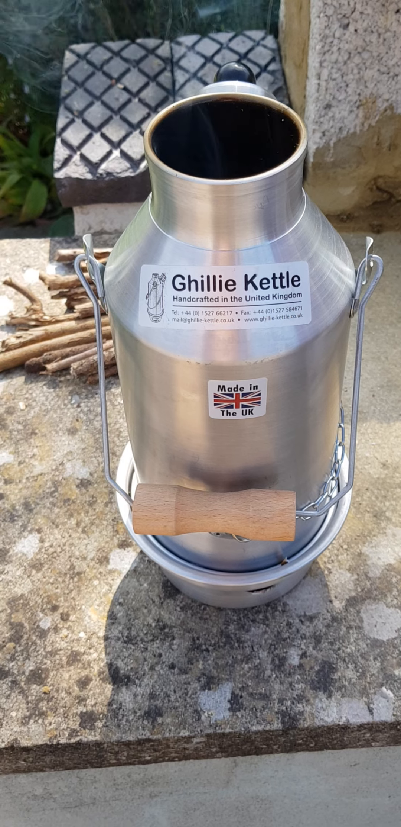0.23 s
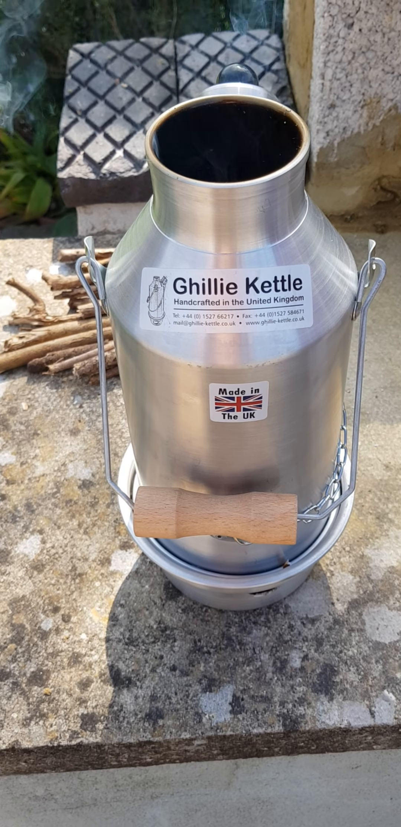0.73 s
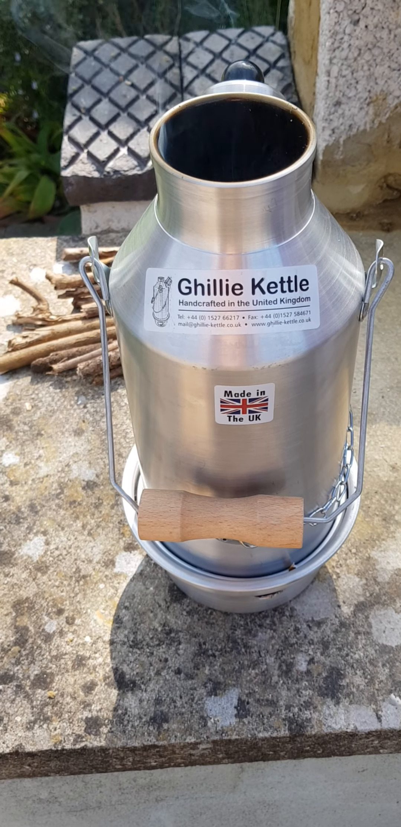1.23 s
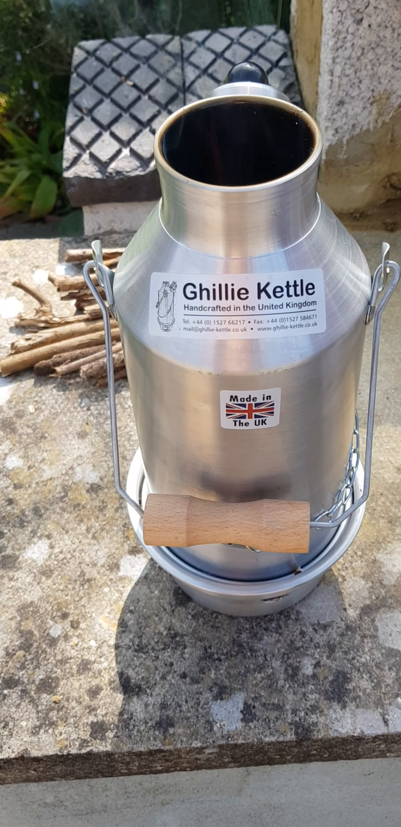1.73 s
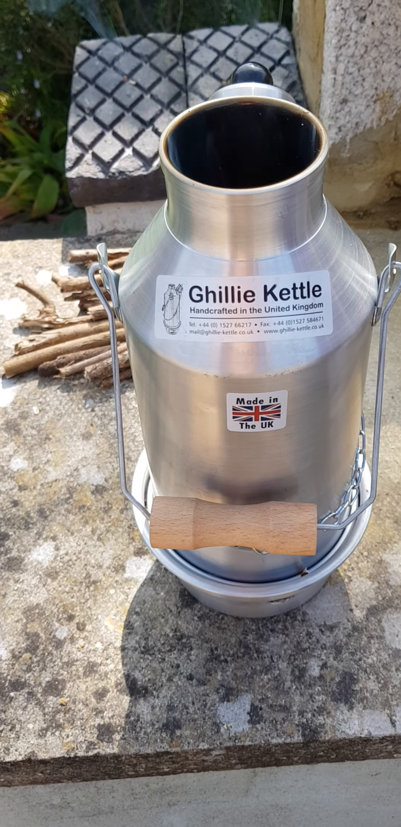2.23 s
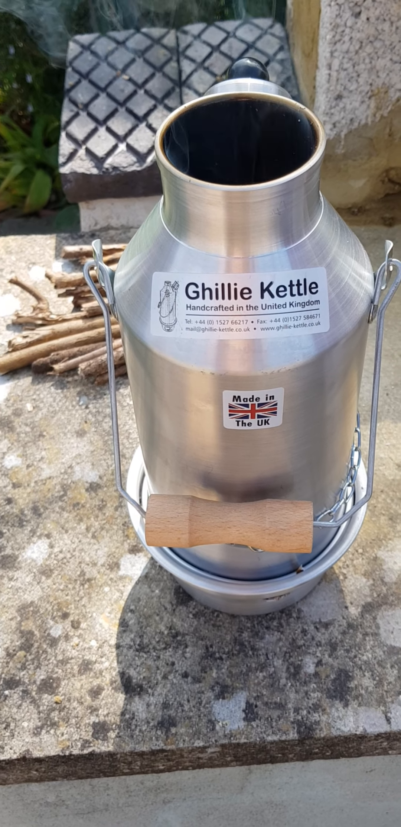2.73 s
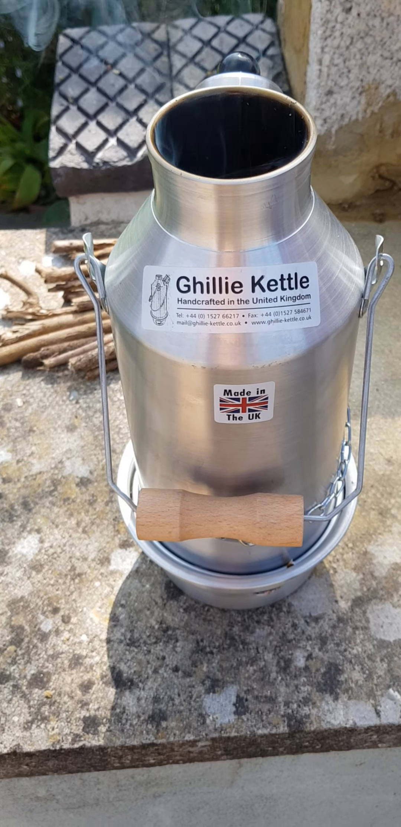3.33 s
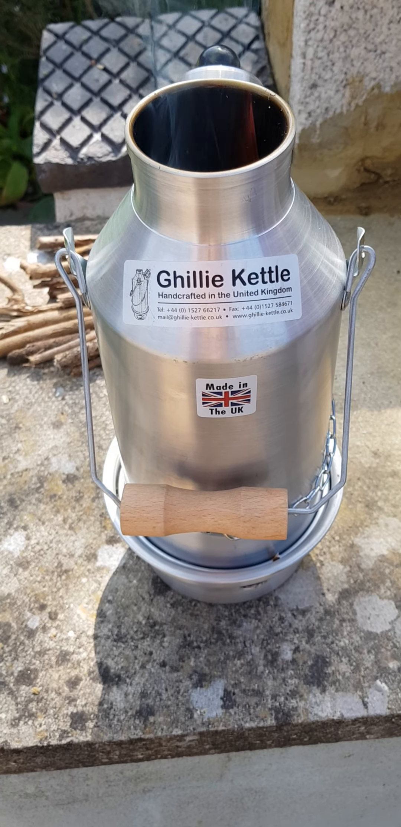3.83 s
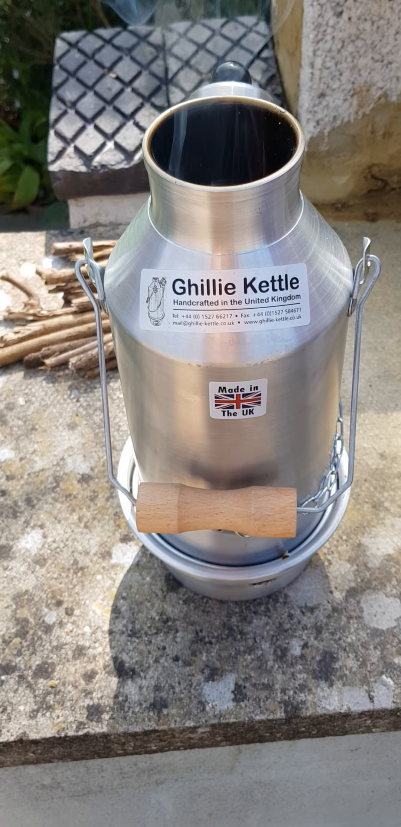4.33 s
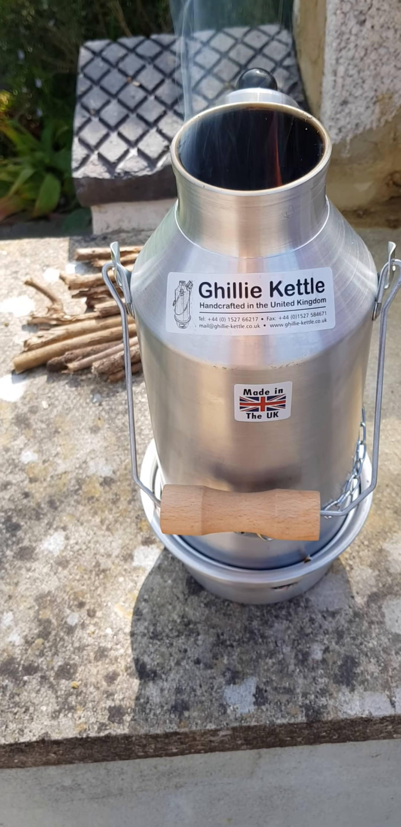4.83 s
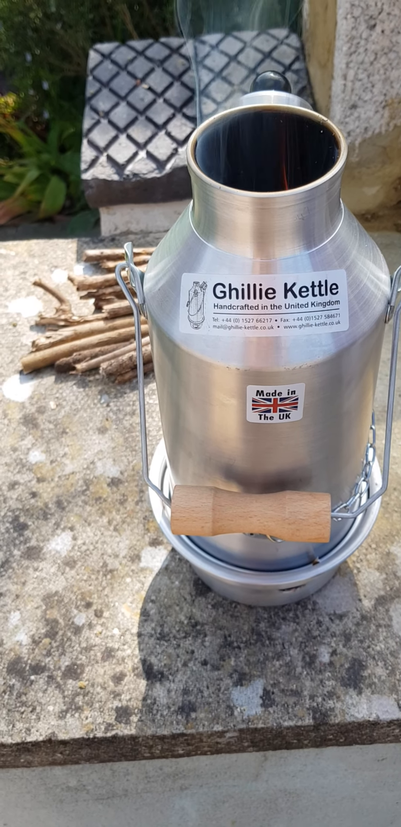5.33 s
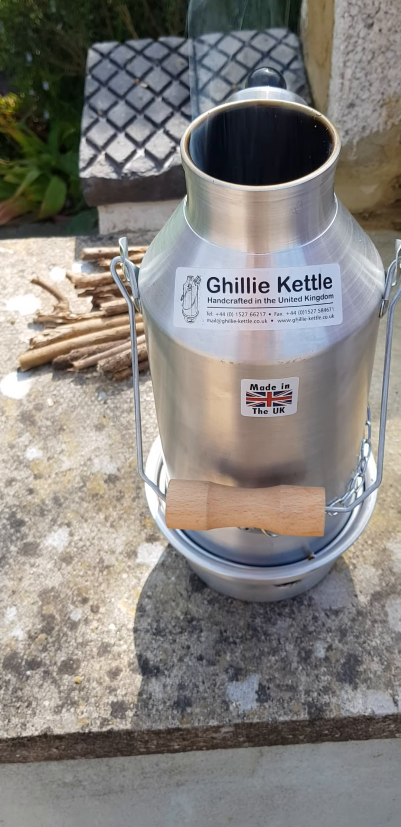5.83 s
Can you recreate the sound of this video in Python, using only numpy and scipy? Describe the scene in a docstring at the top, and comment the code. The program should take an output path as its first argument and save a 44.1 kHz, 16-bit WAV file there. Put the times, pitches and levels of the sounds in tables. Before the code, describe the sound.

Close above a metal chimney kettle outdoors, a twig fire flutters with low, hollow puffs in the flue while fine sizzle and scattered dry cracks continue throughout. Lumpy breeze rumbles on the hand-held stereo microphone, mostly early. Near the middle the puffs grow stronger, then a loud snap rings the metal wall briefly, together with a thud and scrape. Soft finger rubbing and small bumps follow.

```python
"""A twig fire burns inside a metal chimney kettle outdoors, heard from just above it.
Flame puffs strike resonant air modes of the flue; the twigs sizzle in filtered noise and crack in clicks.
Snaps also ring modes of the kettle wall; the warming metal gives a few short pips, nearly pure tones.
A waning breeze rumbles at two microphone ports; fingers rub, scuff and knock the hand-held casing."""
import sys
import numpy as np
from scipy import signal
from scipy.fft import rfft, irfft
from scipy.io import wavfile
from scipy.ndimage import uniform_filter1d

SR = 44100
rng = np.random.default_rng(int(sys.argv[2]) if len(sys.argv) > 2 else 0)


def generate_wav(sig):
    """Save sig (samples, or channels by samples) to the path in sys.argv[1] as 16-bit PCM at SR."""
    pcm = np.round(np.clip(np.atleast_2d(sig).T, -1, 1) * 32767).astype(np.int16)
    wavfile.write(sys.argv[1], SR, pcm)


N = 268304
TIME = np.arange(N) / SR
PORT_LAG_S = .00031  # extra travel from kettle to right port


def flame(flutter_db=-1.0, puff_db=1.5, left_db=-1.03, right_db=2.5, soft_hz=900,
          lead_s=0.0015, puff_ring=1.16, puff_tilt=0.28):
    """Gas puffs ring the air column of the flue; large ones ring longer and favour its upper modes."""
    # large puffs: t/s, level/dB
    puff_rows = [(0.042, -38), (0.265, -40), (0.645, -41.5), (0.7, -42.5), (0.813, -38.5), (0.918, -41),
                 (1.151, -38), (1.259, -37.5), (1.323, -38.5), (1.412, -38.5), (1.55, -38), (1.618, -37.5),
                 (1.81, -39), (2.121, -43.5), (2.975, -36.5), (3.09, -37.5), (3.313, -35), (3.367, -39.5),
                 (3.578, -40), (3.67, -32.5), (3.751, -35.5), (3.804, -41), (3.935, -41.5), (4.047, -40),
                 (4.423, -37), (4.652, -42.5), (4.748, -37), (4.85, -40), (5.259, -41.5), (5.311, -35.5),
                 (5.546, -40.5), (5.777, -42.5), (6.047, -38.5)]
    # air modes of the flue: f/Hz, level/dB, t60/s for small puffs, lag at the right port/ms
    flue_modes = [(86.3, -11, 0.056, 0.5), (172, -7, 0.022, 0.13), (236.6, -7, 0.019, 0.29),
                  (448.2, -3.5, 0.019, 0.29), (641, -21.5, 0.022, 0.0037)]
    # flame strength beneath the flare-ups, sinking and recovering: t/s, level/dB
    flame_bed = [(0, -51.5), (1.0, -48), (1.9, -50.5), (2.4, -52), (4.7, -51.5), (5.15, -54.5),
                 (5.7, -53.5), (6.08, -48)]
    # brief flare-ups: crest t/s, level/dB
    flare_rows = [(0.27, -45.5), (0.429, -41.5), (0.49, -48.5), (2.57, -46), (2.8, -49), (3.39, -44),
                  (3.69, -44.5), (3.841, -43.5), (4.76, -50.5), (5.31, -45), (5.55, -51.5), (5.87, -59)]
    rise_s, fall_s = 0.023, 0.039

    flares = (from_db(db) * swell(crest_s, rise_s, fall_s) for crest_s, db in flare_rows)
    strength = together(gains(flame_bed)[0], flares)
    small = grains(per_s=400, spread_db=2.0) * strength

    puff_s, level_db = np.transpose(puff_rows)
    main_hz = max(flue_modes, key=lambda mode: mode[1])[0]
    flutter, puffs = np.zeros((2, N)), np.zeros((2, N))
    for hz, mode_db, t60_s, lag_ms in flue_modes:
        lag_s = lag_ms / 1000
        # each puff strikes each mode with its own strength and sign
        uneven_small = small * (1 + 0.42 * rng.standard_normal(N))
        flutter_tone = from_db(mode_db) * air_mode(uneven_small, hz, t60_s)
        flutter += [flutter_tone, delayed(flutter_tone, lag_s)]

        signs = rng.choice([-1, 1], len(puff_s))
        sizes = from_db(level_db + rng.normal(0, 1.0, len(puff_s))) * signs
        large = clicks(puff_s - lead_s, sizes * (hz / main_hz) ** puff_tilt)
        puff_tone = from_db(mode_db) * air_mode(large, hz, t60_s * puff_ring)
        puffs += [puff_tone, delayed(puff_tone, lag_s)]

    flutter = rms_one(flutter) * np.sqrt(np.mean(strength ** 2))
    mix = from_db(flutter_db) * flutter + from_db(puff_db) * puffs
    return cut(mix, soft_hz, "low") * from_db([[left_db], [right_db]])


def sizzle(crackle_db=4.0, hiss_db=1.0, low_hz=700, tick_top_hz=9000, swell_hz=220):
    """Sap bursts from twigs in clumps of tiny spits over a hiss; chimney and door each let out their own."""
    # colour: f/Hz, left level/dB, right level/dB
    colour = [(895, -9, -5.5), (1275, -13.5, -13.5), (1902, -12, 0), (2276, -13, -12), (2613, -15, 3.5),
              (3245, -20.6, -5), (3930, -15, 3.5), (4500, -18, -1), (5720, -11.5, 0), (7200, -16.5, -16),
              (8380, -13, -22), (10350, -5, -11), (11800, -2.5, -4), (16300, -11.5, -13)]
    # sizzle strength: t/s, level/dB
    sap = [(0, -64), (0.45, -63), (2.4, -63.5), (2.75, -62.5), (3.95, -61.7), (4.8, -65.5), (6.08, -64.5)]

    def spits():
        """Noise bursts with a smoothed onset and an exponential decay of energy."""
        clumped_per_s = 200 * from_db(3.2 * drift(5.3))
        ticks = grains(clumped_per_s, spread_db=4.5, limit=3.42)
        decay = np.exp(-1 / (0.002 * SR))
        energy = signal.lfilter([1], [1, -decay], ticks ** 2 + 1e-12)
        return np.sqrt(np.abs(cut(energy, swell_hz, "low"))) * rng.standard_normal(N)

    crackle = rms_one(np.array([spits(), spits()]))
    hiss = rng.standard_normal((2, N)) * from_db(1.0 * drift(24))
    mix = from_db(crackle_db) * cut(crackle, tick_top_hz, "low") + from_db(hiss_db) * hiss
    return gains(sap)[0] * cut(through(mix, response(colour)), low_hz, "high")


def cracks(crack_db=4.5, spike_db=3.0, low_hz=1500, door_left_db=-30.0, chimney_right_db=-6.0):
    """Wood fibres break: a spike and its scatter leave by the chimney and by the fire door."""
    # cracks: t/s, chimney level/dB, fire-door level/dB
    crack_rows = [(0.128, -55, -62), (0.254, -59, -51.0), (0.317, -46, -38), (0.321, -44.5, -44),
                  (0.4308, -50.5, -47.5), (0.682, -76, -44), (0.798, -66, -45.5), (1.028, -50, -39.5),
                  (1.6247, -51, -43), (1.7646, -53, -51), (1.9861, -56, -43.5), (2.053, -47, -52),
                  (2.0937, -44, -64), (2.1267, -49.5, -70), (2.637, -52, -73), (2.7198, -52.0, -45.5),
                  (2.893, -49, -56), (3.335, -48, -49), (3.368, -44, -35.5), (3.456, -69, -46),
                  (3.5874, -47.5, -63), (3.6716, -61, -44), (3.8135, -52, -38.5), (3.8392, -47, -35.5),
                  (3.852, -38, -39), (4.0336, -46.5, -50.5), (4.5146, -48, -43), (4.8952, -57, -42.5),
                  (5.3084, -55, -48), (5.4068, -55, -49), (5.4274, -48, -72), (5.5155, -49.5, -64),
                  (5.5842, -51, -52), (5.929, -59, -48)]
    # colour: f/Hz, chimney level/dB, fire-door level/dB
    crack_colour = [(985, -45, -27), (1690, -5, 8), (2660, -32, 1.5), (4050, -7, 8), (5580, -3, 7.5),
                    (8250, -4.5, -13), (11600, 8, -20), (15700, -3, -4.5)]

    s, chimney_db, door_db = np.transpose(crack_rows)
    hits = np.array([clicks(s, from_db(chimney_db)), clicks(s, from_db(door_db))])
    colour = response(crack_colour)
    colour = colour / np.linalg.norm(colour, axis=1, keepdims=True)
    burst = from_db(spike_db) * hits + scatter(hits, t60_s=.013, tail_db=-19, tail_t60_s=.07)
    chimney, door = from_db(crack_db) * cut(through(burst, colour), low_hz, "high")
    left = chimney + from_db(door_left_db) * delayed(door, PORT_LAG_S)
    right = door + from_db(chimney_right_db) * delayed(chimney, PORT_LAG_S)
    return np.array([left, right])


def snaps(wall_db=-3.5, edge_db=2.0, settle=0.071, shatter=0.45):
    """A twig splits and strikes the kettle wall; splinters keep it ringing briefly."""
    # big snaps: t/s, level/dB
    snap_rows = [(1.03, -52), (3.369, -29.5), (3.8515, -24), (3.8529, -25)]
    # kettle wall modes, damped by the water: f/Hz, level/dB, t60/s
    wall_modes = [(730, -1, .02), (1160, -11, .014), (1420, 1, .02), (1770, -4, .014), (2230, -3, .016),
                  (2650, -12, .012)]

    s, db = np.transpose(snap_rows)
    hits = clicks(s, from_db(db))
    splinters = scatter(hits, t60_s=0.018, tail_db=-21.5, tail_t60_s=0.34)
    drive = hits + settle * splinters
    wall = np.zeros((2, N))
    for k, (hz, mode_db, t60_s) in enumerate(wall_modes):
        wall += (-1) ** k * from_db(mode_db) * ring(drive, hz, t60_s)
    edge = hits + shatter * scatter(hits, t60_s=0.0039, tail_db=-49, tail_t60_s=0.23)
    left, right = from_db(wall_db) * wall * from_db([[-9], [0]]) + from_db(edge_db) * edge
    return np.array([left, delayed(right, PORT_LAG_S)])


def pips(echo_db=-17, late_db=-26, left_db=-5, width_s=.003):
    """Warming metal gives sines under short Gaussian envelopes, with two echoes off the walls."""
    # pips: crest t/s, f/Hz, level/dB
    pip_rows = [(1.455, 1380, -54), (1.932, 1410, -52), (3.306, 1290, -53), (3.964, 1270, -40.5),
                (3.9973, 1420, -28.5), (5.365, 1330, -42), (5.748, 1490, -32.5), (5.795, 1400, -33.5)]

    out = np.zeros(N)
    for s, hz, db in pip_rows:
        near = np.abs(TIME - s) < .05
        t = TIME[near] - s
        envelope = np.exp(-.5 * (t / width_s) ** 2)
        out[near] += from_db(db) * envelope * np.sin(2 * np.pi * hz * t)
    early, late = delayed(out, .012), delayed(out, .021)
    echoes = from_db(echo_db) * early + from_db(late_db) * late
    return np.array([from_db(left_db) * out, delayed(out, PORT_LAG_S)]) + echoes


def breeze(wind_db=-0.5, lump_db=5.0):
    """Eddies press on each port separately, in lumps; gusts swell and fade over a waning breeze."""
    # breeze beneath the gusts, slowly changing: t/s, left level/dB, right level/dB
    breeze_bed = [(0, -45, -52), (0.6, -51, -56.5), (1.4, -54, -51), (2.2, -65, -50), (3.4, -58, -58),
                  (4.3, -57, -51.5), (6.08, -68, -65)]
    # rumble colour: f/Hz, level/dB
    rumble = [(15, -1), (30, -7), (50, 5.5), (80, -4.5), (120, -6.5), (200, -25), (500, -60.5)]
    # gusts on the ports: crest t/s, length/s, left level/dB, right level/dB
    gust_rows = [(0.01, 0.049, -29, -39.5), (0.177, .12, -40.5, -53), (0.475, 0.067, -54, -34.5),
                 (0.75, 0.039, -38, -50), (1.033, 0.15, -48, -35), (1.122, 0.097, -55, -35.5),
                 (1.262, 0.089, -42.5, -47), (1.524, .07, -47, -47), (1.63, 0.033, -54, -33.5),
                 (1.716, 0.051, -43, -31.5), (1.837, 0.078, -65, -37), (1.948, .08, -64, -36),
                 (2.07, 0.085, -53, -42.5), (2.375, 0.086, -65, -37.5), (2.55, 0.094, -50, -41),
                 (2.83, .05, -49, -40)]

    eddies = through(rng.standard_normal((2, N)), response(rumble, size=8192))
    # even out the running level before the lumps set it
    eddies = eddies / np.sqrt(uniform_filter1d(eddies ** 2, size=3500) + 1e-9)
    lumps = from_db(lump_db * np.array([drift(18), drift(8)]))
    gusts = (from_db([[left_db], [right_db]]) * swell(s, length_s / 2, length_s / 2)
             for s, length_s, left_db, right_db in gust_rows)
    return from_db(wind_db) * together(gains(breeze_bed), gusts) * lumps * eddies


def rubbing(rub_db=-1.0, hollow_db=-7.5, hollow_hz=1330, low_hz=550):
    """Fingers stroke and grip the casing: rough friction noise plus a hollow cavity resonance."""
    # colour: f/Hz, left level/dB, right level/dB
    rub_colour = [(670, -6.5, -1.5), (965, -16, -8), (1120, -12.5, -1.5), (1470, -16.5, -1.5),
                  (1660, -19, -18.5), (2750, -27, -13), (3360, -33, -20.5), (4370, -27, -18.5),
                  (6300, -27, -20.5), (8340, -32, -31), (12300, -23, -19.5), (15500, -29, -21.5)]
    # light finger strokes: crest t/s, swell time/s, level/dB
    stroke_rows = [(0.48, .2, -61), (2.39, 0.03, -62), (4.21, 0.067, -59.5), (4.411, 0.042, -52),
                   (4.66, .03, -54), (4.773, 0.11, -48.5), (5.17, 0.13, -59), (5.33, 0.091, -56.5),
                   (5.49, .07, -59.5), (6.06, 0.11, -80)]
    # faint rub of the grip, fading and returning: t/s, level/dB
    grip = [(0, -65), (1.0, -72.5), (3.0, -70), (4.1, -65), (6.08, -62.5)]
    stop_s = 0.016

    strokes = (from_db(db) * swell(s, rise_s, stop_s) for s, rise_s, db in stroke_rows)
    sliding = together(gains(grip)[0], strokes)
    # the cavity at the right port colours the swish
    hollow = rms_one(air_mode(rng.standard_normal(N), hollow_hz, t60_s=0.007)) * from_db([[-17], [0]])
    return sliding * (from_db(rub_db) * friction(rub_colour, low_hz) + from_db(hollow_db) * hollow)


def scuffs(scuff_db=-1.5, low_hz=250, treble_hz=2800):
    """Hard scrapes on the casing: short bursts of friction, each with its own share of treble."""
    # colour: f/Hz, left level/dB, right level/dB
    scuff_colour = [(394, 0, -9), (1000, -13.5, -2.5), (2060, -16, -2), (2220, -28, -13.5),
                    (4000, -23, -10), (5760, -31, -6), (7940, -22, -26.5), (12000, -20, -11.5),
                    (15500, -41, -13.5)]
    # scuffs: start t/s, length/s, level/dB, treble re body/dB
    scuff_rows = [(3.843, 0.016, -39, 1), (3.866, 0.023, -54, 16), (3.927, 0.027, -46.5, 4),
                  (5.784, 0.037, -47, -8), (5.819, 0.011, -38.5, -14), (5.84, 0.0033, -35.5, -15),
                  (5.856, 0.0054, -37, -12)]
    attack_s, release_s = 0.0041, .005

    body = cut(friction(scuff_colour, low_hz), treble_hz, "low")
    rasp = cut(friction(scuff_colour, low_hz), treble_hz, "high")
    out = np.zeros((2, N))
    for s, length_s, db, treble_db in scuff_rows:
        envelope = held(s, length_s, attack_s, release_s)
        out += from_db(scuff_db + db) * envelope * (body + from_db(treble_db) * rasp)
    return out


def knocks(knock_db=-4):
    """Dull thuds on the microphone: each bump rings one low damped sine."""
    # knocks: t/s, f/Hz, left level/dB, right level/dB, t60/s
    knock_rows = [(0.744, 59.6, -20.5, -42, 0.075), (1.024, 93, -47, -16.5, 0.11),
                  (1.111, 71, -44, -20, 0.15), (3.8391, 81, -51, -2, 0.019), (3.8522, 103, -19, -2, 0.014),
                  (3.859, 58.3, -9, -42, 0.056), (3.929, 60, -32, -17, 0.088),
                  (5.794, 83, -35, -21.5, 0.044), (5.862, 103, -26.5, -19, 0.044)]

    out = np.zeros((2, N))
    for s, hz, left_db, right_db, t60_s in knock_rows:
        out -= ring(clicks([s], from_db(knock_db)), hz, t60_s) * from_db([[left_db], [right_db]])
    return out


def friction(spectrum, low_hz, rough_db=3.0):
    """Coloured noise of rms 1 whose level flickers fast, as the skin slips."""
    slips = rng.standard_normal((2, N)) * from_db(rough_db * drift(108))
    return rms_one(cut(through(slips, response(spectrum)), low_hz, "high"))


def air_mode(x, hz, t60_s):
    """A resonance passed twice: it swells, then decays, with steep skirts; a unit click peaks near 1."""
    t = np.arange(SR // 5) / SR
    envelope = t * 1000 ** (-t / t60_s)
    return signal.fftconvolve(x, envelope / envelope.max() * np.sin(2 * np.pi * hz * t))[:N]


def ring(x, hz, t60_s):
    """Two-pole resonator: a unit click starts a damped sine of initial height 1."""
    r, w = 1000 ** (-1 / (t60_s * SR)), 2 * np.pi * hz / SR
    return signal.lfilter([0, np.sin(w)], [1, -2 * r * np.cos(w), r * r], x + 1e-18)


def scatter(hits, t60_s, tail_db, tail_t60_s):
    """Each hit is a brief noise burst, then a weaker tail of reflections in the metal tube."""
    def dying_energy(seconds):
        """Energy falls 60 dB in the given time."""
        return signal.lfilter([1], [1, -1e-6 ** (1 / (seconds * SR))], hits ** 2 + 1e-18)

    energy = dying_energy(t60_s) + from_db(2 * tail_db) * dying_energy(tail_t60_s)
    return np.sqrt(energy) * rng.standard_normal((2, N))


def grains(per_s, spread_db, limit=5.25):
    """Random clicks of either sign, many small and a few large."""
    excess_db = spread_db * np.minimum(rng.exponential(1, N), limit)
    sizes = from_db(excess_db) * rng.choice([-1, 1], N)
    return sizes * (rng.random(N) < per_s / SR)


def clicks(times_s, sizes):
    """Single-sample clicks at given times."""
    out = np.zeros(N)
    out[(np.asarray(times_s) * SR).astype(int)] = sizes
    return out


def drift(rate_hz):
    """Slow random curve of rms 1: noise through two equal poles, run at SR/40 and interpolated."""
    r = np.exp(-80 * np.pi * rate_hz / SR)
    noise = rng.standard_normal(N // 40 + 2002)
    slow = signal.lfilter([1], [1, -2 * r, r * r], noise)[2000:]  # drop the run-in
    return np.interp(np.arange(N) / 40, np.arange(len(slow)), rms_one(slow))


def swell(crest_s, rise_s, fall_s):
    """Gaussian rise to 1 at the crest and Gaussian fall."""
    t = TIME - crest_s
    return np.exp(-.5 * (t / np.where(t < 0, rise_s, fall_s)) ** 2)


def held(start_s, length_s, attack_s, release_s):
    """Exponential attack, hold at 1, exponential release."""
    before_s = np.maximum(start_s - TIME, 0)
    after_s = np.maximum(TIME - start_s - length_s, 0)
    return np.exp(-before_s / attack_s - after_s / release_s)


def together(bed, surges):
    """Independent surges add to a bed in power."""
    return np.sqrt(bed ** 2 + sum(surge ** 2 for surge in surges))


def delayed(x, seconds):
    """The same sound, later."""
    return np.interp(TIME - seconds, TIME, x)


def response(spectrum, size=2048):
    """Minimum-phase impulse responses, one per dB column of a spectrum; mean energy 1."""
    hz, *columns = np.transpose(spectrum)
    log_hz = np.log(np.fft.rfftfreq(size, 1 / SR) + 1)
    magnitude = from_db([np.interp(log_hz, np.log(hz), c) for c in columns])
    cepstrum = irfft(np.log(magnitude))
    # fold the cepstrum to make the response causal
    cepstrum[:, 1:size // 2] *= 2
    cepstrum[:, size // 2 + 1:] = 0
    return rms_one(irfft(np.exp(rfft(cepstrum)))) / np.sqrt(size)


def through(x, impulse):
    """Filter by impulse responses, one per row."""
    return signal.fftconvolve(np.atleast_2d(x), impulse, axes=1)[:, :N]


def cut(x, hz, kind):
    """Second-order high- or low-pass."""
    return signal.sosfilt(signal.butter(2, hz, kind, fs=SR, output="sos"), x)


def gains(rows):
    """Gain curves from rows of t/s, level/dB, ..."""
    s, *columns = np.transpose(rows)
    return from_db([np.interp(TIME, s, c) for c in columns])


def rms_one(x):
    """Scale to rms 1."""
    return x / np.sqrt(np.mean(x ** 2) + 1e-20)


def from_db(db):
    """Decibels to gain."""
    return 10 ** (np.asarray(db) / 20)


def scene():
    """Fire and kettle, with wind and fingers at the microphone."""
    fire = flame() + sizzle() + cracks() + snaps()
    handling = rubbing() + scuffs() + knocks()
    return fire + pips() + breeze() + handling


def record(dry):
    """Cut the deepest bass gently and the top steeply."""
    low_pass = signal.ellip(10, .1, 80, 16000, fs=SR, output="sos")
    return signal.sosfilt(low_pass, cut(dry, 38, "high"))


dry = scene()
out = record(dry)
generate_wav(out)
```